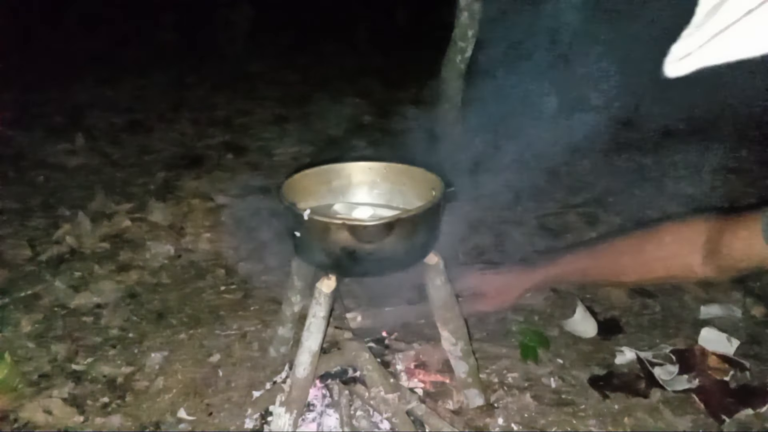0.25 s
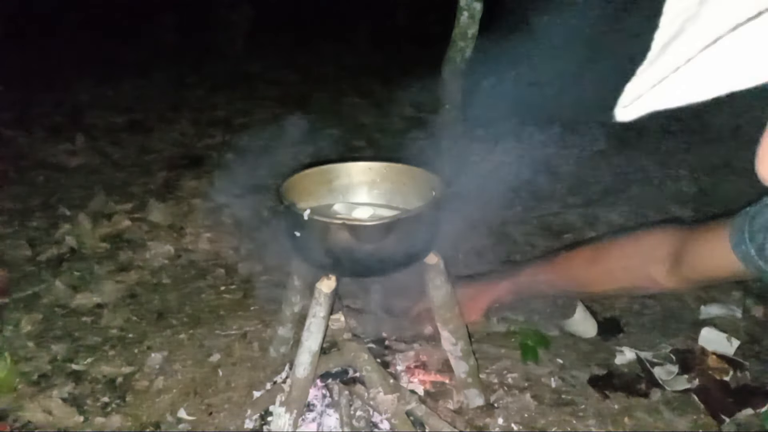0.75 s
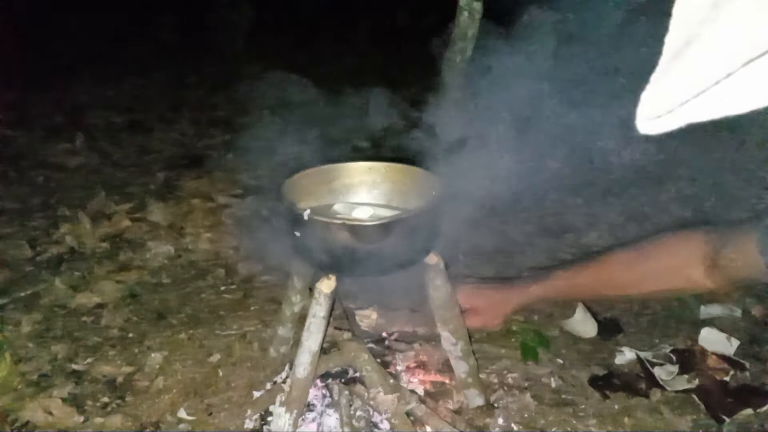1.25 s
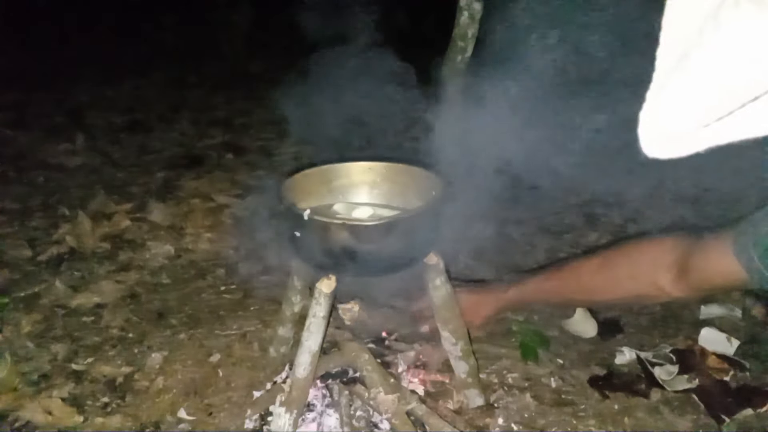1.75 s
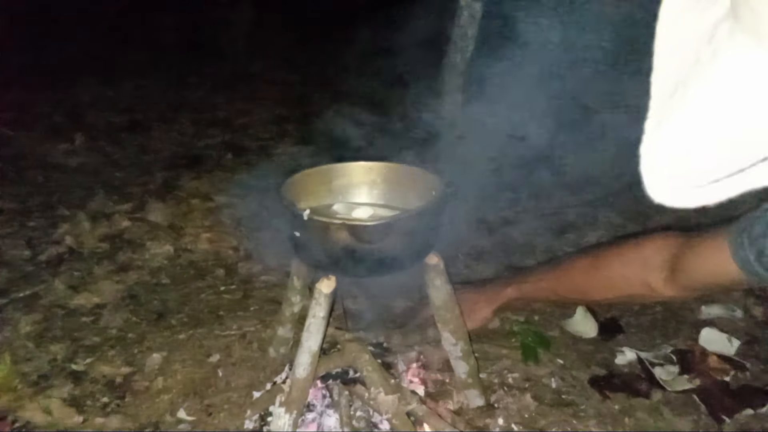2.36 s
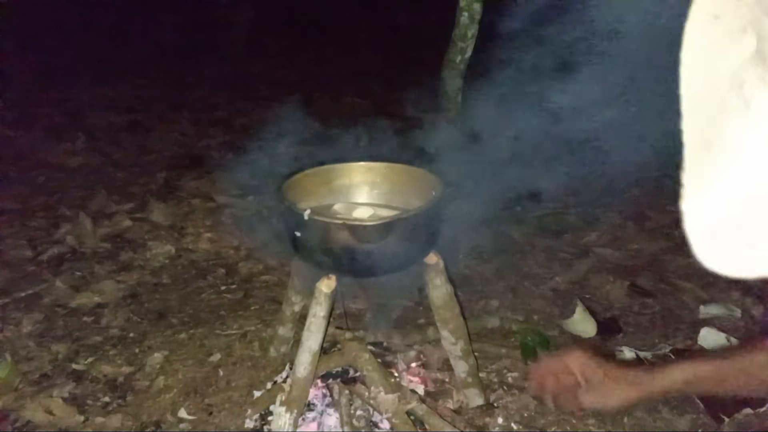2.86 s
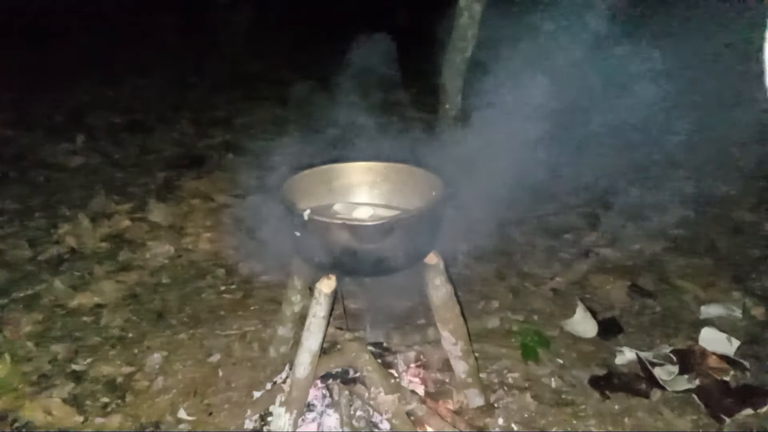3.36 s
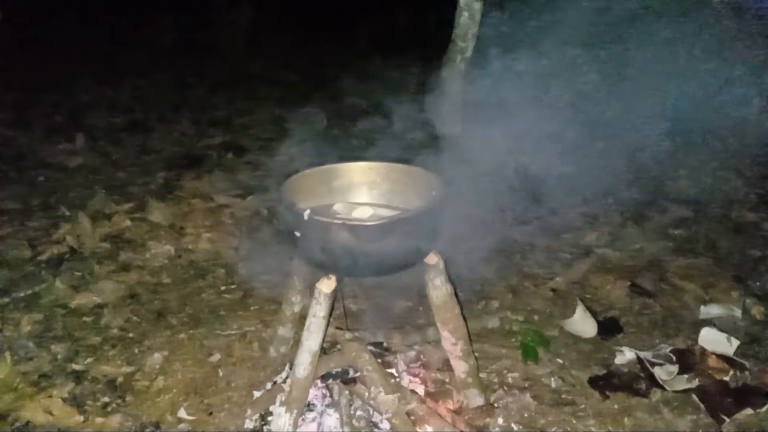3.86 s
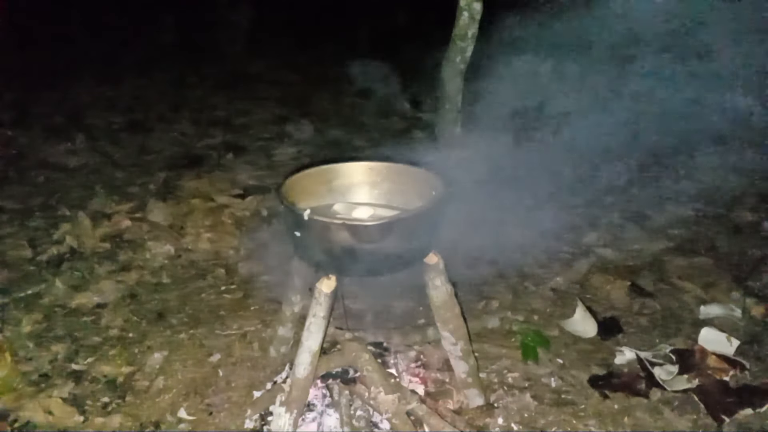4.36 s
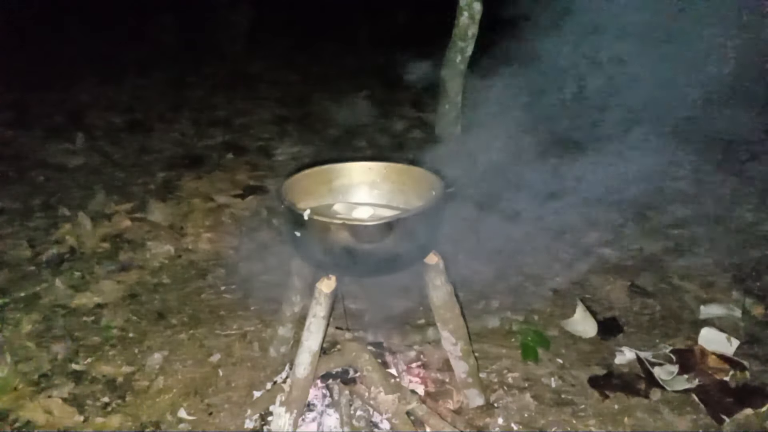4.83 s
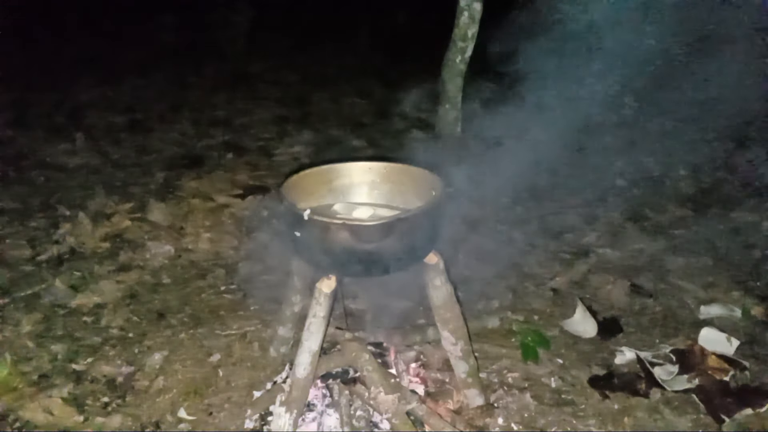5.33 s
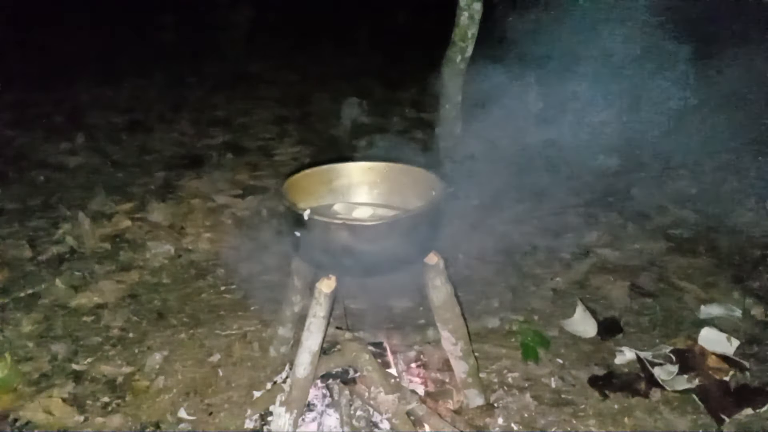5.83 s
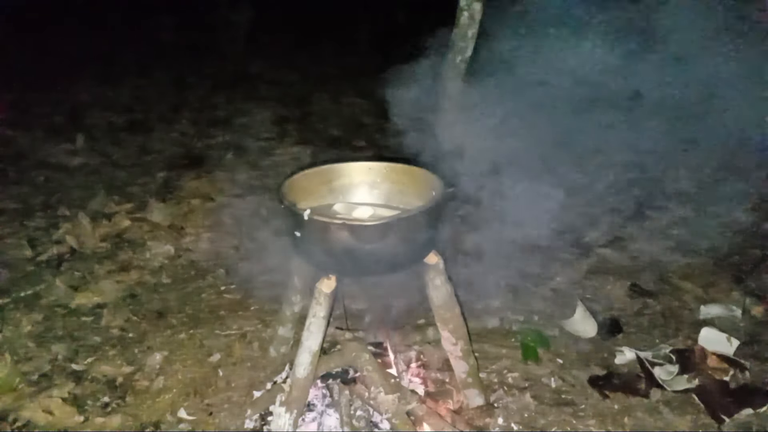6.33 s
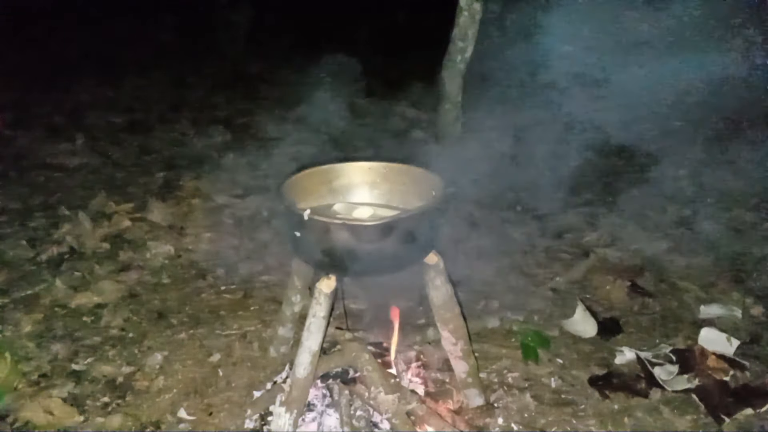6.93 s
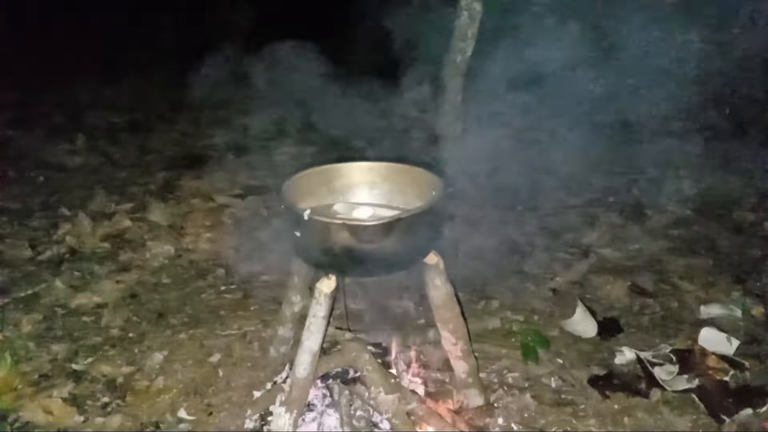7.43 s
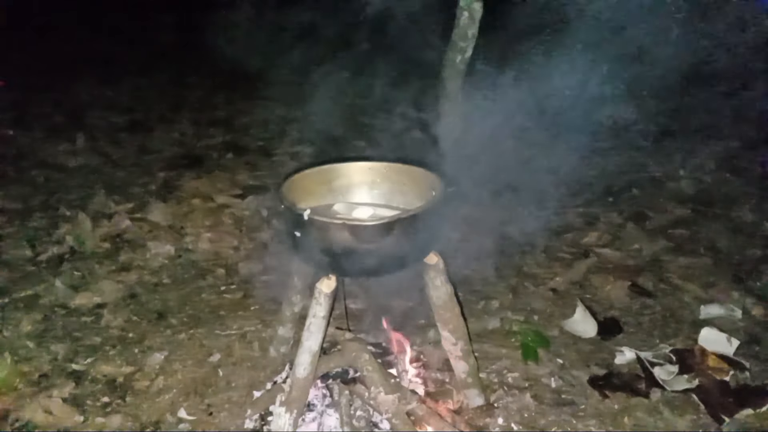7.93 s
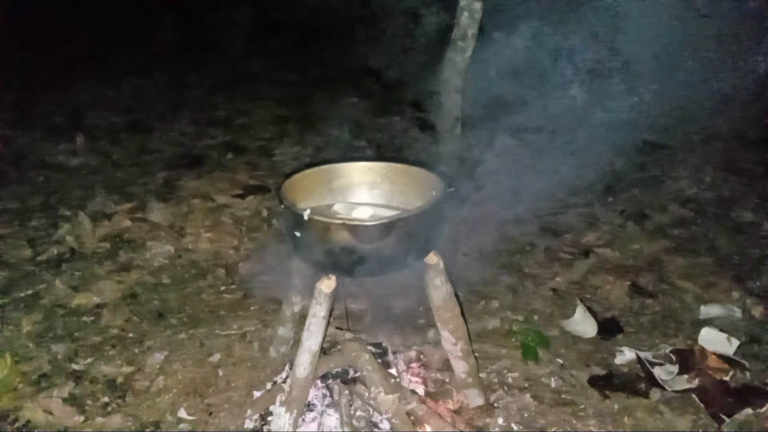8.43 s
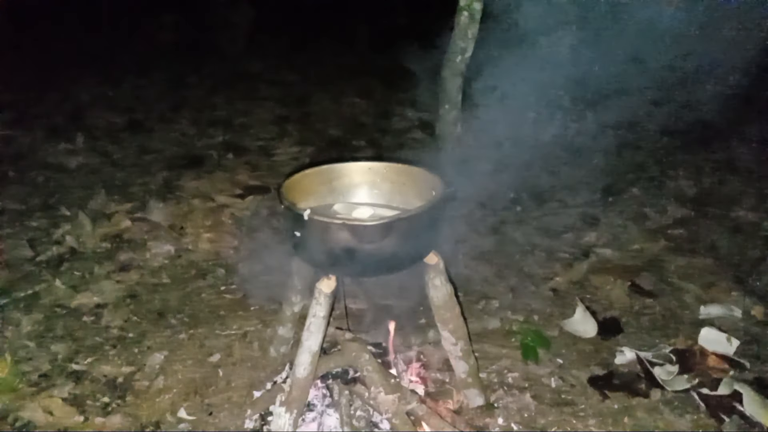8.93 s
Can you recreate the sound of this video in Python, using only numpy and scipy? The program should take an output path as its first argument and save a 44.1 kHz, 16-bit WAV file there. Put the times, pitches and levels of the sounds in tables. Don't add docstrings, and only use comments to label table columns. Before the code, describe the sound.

A night forest, about nine seconds, heard from beside a small wood fire. Tree crickets trill around 3.7 kHz throughout, over a blurred field-cricket chorus near 5 kHz and thin higher shimmer. From 0 to 1.5 a near cricket dominates, its crisp two- or three-stroke chirps falling in pitch, four to five per second. It rests; the chorus dips briefly near 2.2, 3.1 and 3.4. Small snaps come at 3.1 and, more sharply, 3.8, with leaf rustle, as a distant, echoing cricket calls from 3.5 to 4.3. The near cricket returns from 4.9 to 6.8, over light ticks. From 7.1 to 8.9 the far cricket answers again while twig cracks, sparks and dry rustles gather, strongest near 8.1 to 8.25. Faint katydid rasps pulse high throughout; flame murmur, soft gusts and low night hum stay barely audible.

```python
import sys
import numpy as np
from scipy import signal
from scipy.fft import rfft, irfft, next_fast_len
from scipy.io import wavfile
from scipy.ndimage import map_coordinates

SR = 44100
rng = np.random.default_rng(int(sys.argv[2]) if len(sys.argv) > 2 else 0)


def transcribe(signal):
    frames = np.atleast_2d(signal).T
    limited = np.clip(frames, -1, 1)
    pcm = np.round(limited * 32767).astype(np.int16)
    wavfile.write(sys.argv[1], SR, pcm)


def voltage_ratio(decibels):
    exponent = np.asarray(decibels, float) / 20
    return 10 ** exponent


N = 405279


def rms_one(x):
    return x / np.sqrt(np.mean(x ** 2) + 1e-20)


def coloured(x, spectrum):
    hz, db = np.transpose(spectrum)
    size = next_fast_len(N)
    log_hz = np.log(np.fft.rfftfreq(size, 1 / SR) + 1)
    gain = voltage_ratio(np.interp(log_hz, np.log(hz), db, left=-90, right=-90))
    return irfft(rfft(x, size) * gain, size)[:N]


def drift(rate_hz):
    return np.interp(np.arange(N) / SR * rate_hz, np.arange(4000), rng.standard_normal(4000)) * 1.2


def band(x, low_hz, high_hz, order=2):
    sos = signal.butter(order, [low_hz, high_hz], "band", fs=SR, output="sos")
    return signal.sosfilt(sos, x + 1e-18)


def blur(spectrum, patchy_db, rate):
    noise = coloured(rng.standard_normal(N), spectrum)
    return rms_one(noise * voltage_ratio(patchy_db * drift(rate)))


def trees(x, t60, wet_db):
    t = np.arange(SR // 2) / SR
    tail = rng.standard_normal(len(t)) * voltage_ratio(-60 * t / t60) * (t > .004)
    return x + voltage_ratio(wet_db) * signal.fftconvolve(x, tail / np.linalg.norm(tail))[:N]


def dip(start, end, db, edge):
    return np.interp(np.arange(N) / SR, [start - edge, start, end, end + edge], [0, db, db, 0])


def swells(rows, rise_db_s, fall_db_s):
    t = np.arange(0, N, 32) / SR
    gains = 0
    for start, end, *db in rows:
        rise = np.minimum(rise_db_s * (t - start), 0)
        fall = np.minimum(fall_db_s * (end - t), 0)
        gains = gains + voltage_ratio(np.add.outer(db, rise + fall))
    return np.repeat(gains, 32, axis=1)[:, :N]


def chirps(rows, first_db, first_overtone_db, later_overtone_db):
    first_lead_s = .0008
    out = []
    for s, second, third, db in rows:
        out.append((s - first_lead_s, db + first_db, first_overtone_db))
        for gap, late in [(second, second), (third, second + third)]:
            if gap > .02:
                out.append((s + late, db, later_overtone_db))
    return out


def strokes(events, stroke, spread, third_db=-30, opening=((0, 0),), waver_db=0):
    tone, overtones = np.zeros((2, N + SR))
    ms, hz, db = np.transpose(stroke)
    t = np.arange(ms[0], ms[-1], 1000 / SR)
    edge, soft_edge = signal.windows.tukey(len(t), .12), signal.windows.tukey(len(t), .4)
    second_shape = np.exp(-((t - 13) / 8) ** 2) * soft_edge
    third_shape = np.exp(-((t - 9.5) / 5.5) ** 2) * soft_edge
    first_half = np.clip((9 - t) / 3, 0, 1)
    waver = waver_db * drift(250)
    chances = rng.standard_normal((len(events), 3))
    for (s, peak_db, *second_db), (slow, tune, phase) in zip(events, chances):
        late = t * (1 + 4 * spread * slow)
        turn = 2 * np.pi * np.cumsum(np.interp(late, ms, hz) * (1 + spread * tune)) / SR + phase
        at = round((s + ms[0] / 1000) * SR)
        span = slice(at, at + len(t))
        opening_db = first_half * np.interp(s, *np.transpose(opening))
        level = voltage_ratio(peak_db + opening_db + waver[(at + np.arange(len(t))) % N])
        tone[span] += level * edge * np.interp(late, ms, voltage_ratio(db)) * np.sin(turn)
        rough_db = sum(second_db or [-34])
        second = second_shape * np.sin(2 * turn)
        third = third_shape * voltage_ratio(third_db - rough_db / 2) * np.sin(3 * turn)
        overtones[span] += voltage_ratio(peak_db + rough_db) * (second + third)
    return np.array([tone, overtones])[:, :N]


# start in seconds, gap to second stroke in ms, gap to third in ms (0 = none), peak in dB.
NEAR_CHIRPS = [(0.056, 38.5, 41.2, -28.6), (0.2746, 38.0, 40.0, -28.4), (0.5274, 39.4, 0.0, -28.4),
               (0.7498, 38.2, 0.0, -28.8), (0.9624, 41.5, 0.0, -28.8), (1.1727, 35.0, 41.2, -29.0),
               (1.3886, 38.8, 40.2, -29.6), (4.8529, 0.0, 0.0, -40), (4.8938, 41.5, 0.0, -27.8),
               (5.1145, 40.2, 40.3, -28.7), (5.3333, 38.4, 40.6, -29.2), (5.5717, 35.9, 41.3, -28.5),
               (5.7872, 38.7, 40.9, -28.2), (6.0042, 37.6, 40.5, -28.1), (6.2616, 37.1, 0.0, -28.8),
               (6.4751, 40.1, 0.0, -28.4), (6.697, 37.6, 40.4, -27.9)]
# time in seconds, level in dB.
NEAR_OPENING_DB = [(0.0, 0.1), (0.8, -1), (1.2, -0.5), (1.45, -3), (4.9, 0.5), (5.2, -0.7), (5.7, -1.3),
                   (6.1, -0.1), (6.5, -0.5), (6.75, -0.4)]
# time in ms, pitch in Hz, level in dB.
NEAR_WING_STROKE = [(-3.2, 6700, -30), (-2, 6100, -12), (-1, 5520, -22), (.1, 5410, -5), (2.5, 5340, -1),
                    (7.5, 5195, -1), (10.3, 5090, 0), (13.1, 4985, -4), (15.8, 4845, -3), (18, 4765, -4),
                    (19.6, 4720, -9), (21.5, 4690, -26)]
# frequency in Hz, level in dB.
GROUND_COLOUR = [(3000, -14), (4850, -13), (5100, 0), (9000, 0)]


def near_cricket():
    ground_null_hz, ground_echo_db = 5226, -3
    rows = np.multiply(NEAR_CHIRPS, [1, 1 / 1000, 1 / 1000, 1])
    events = chirps(rows, first_db=-1.5, first_overtone_db=-20, later_overtone_db=-28)
    tone, overtones = strokes(events, NEAR_WING_STROKE, spread=0.00094, third_db=-26,
                              opening=NEAR_OPENING_DB, waver_db=1.28)
    lag = 18.5 * SR / ground_null_hz
    delayed = map_coordinates(tone, [np.arange(N) - lag], order=3)
    echo = coloured(delayed, GROUND_COLOUR)
    near = voltage_ratio(-3.8) * (tone + voltage_ratio(ground_echo_db) * echo) + overtones * voltage_ratio(5 * drift(420))
    return trees(near, t60=.22, wet_db=-16)


# start in seconds, gap to second stroke in seconds, gap to third in seconds, peak in dB.
FAR_CHIRPS = [(3.513, 0, 0, -59), (3.6007, 0.046, .0437, -40.5), (3.9924, 0, 0, -41),
              (4.2057, 0.051, 0, -39), (7.1024, 0, 0, -39), (7.317, 0.039, 0, -41),
              (7.5328, 0.041, .0386, -42), (7.748, 0.039, 0, -39), (7.957, 0.035, 0, -38),
              (8.17, .0386, 0, -38), (8.3852, 0.041, 0, -37.5), (8.5615, 0, 0, -49), (8.8475, 0, 0, -45)]
# time in ms, pitch in Hz, level in dB.
FAR_WING_STROKE = [(0, 5900, -20), (2.5, 5770, -3), (7, 5520, 0), (12, 5270, -4), (16.5, 5050, -22)]


def far_cricket():
    events = chirps(FAR_CHIRPS, first_db=-1.5, first_overtone_db=-35, later_overtone_db=-35)
    calls = strokes(events, FAR_WING_STROKE, spread=0.013).sum(0)
    return voltage_ratio(-2.5) * trees(calls, t60=.3, wet_db=-5)


# start in seconds, end in seconds, level in dB, teeth per second.
KATYDID_BOUTS = [(0.12, 0.2, -80, 343), (0.21, 0.56, -71, 342.5), (0.61, 0.86, -72, 347.5),
                 (0.87, 1.12, -75, 341), (1.12, 1.36, -71, 346), (1.33, 1.56, -73, 344),
                 (1.6, 1.88, -69, 342), (1.94, 2.1, -81, 345), (2.07, 2.23, -74, 345),
                 (2.22, 2.5, -71, 342.5), (2.48, 2.64, -81, 344), (2.73, 3.05, -70, 340),
                 (3.32, 3.66, -72.5, 342), (3.85, 4.17, -70, 342), (4.38, 4.7, -71, 339.5),
                 (4.84, 5.08, -72.5, 344.5), (5.03, 5.3, -72, 342), (5.55, 5.8, -73.5, 341.5),
                 (5.78, 5.93, -77, 343), (5.97, 6.16, -77, 346), (6.32, 6.66, -69, 344),
                 (6.92, 7.2, -76, 341.5), (7.4, 7.6, -72, 347), (7.89, 8.14, -70, 341),
                 (8.39, 8.7, -68, 343), (8.76, 8.9, -77, 348), (9.0, 9.3, -68.5, 344)]
# frequency in Hz, level in dB.
KATYDID_WING = [(9300, -15.5), (9800, -4.5), (10500, 1), (11200, -1.5), (11800, -9), (12400, -21.5),
                (13200, -32.5)]


def katydids(rough):
    bout_skew = .65
    lines = range(13)
    clicks = np.zeros(N)
    fading_db = [3 * drift(15) + 2 * drift(70) for k in lines]
    waver = .055 * drift(45)
    for start, end, db, teeth_per_s in KATYDID_BOUTS:
        span = slice(round(start * SR), min(round(end * SR), N))
        t = np.arange(N)[span] / SR
        turn = 2 * np.pi * teeth_per_s * t + waver[span]
        effort = np.sin(np.pi * np.clip((t - start) / (end - start), 0, 1) ** bout_skew)
        comb = 0
        for k in lines:
            line_gain = effort ** (.4 + .16 * k) * voltage_ratio(fading_db[k][span])
            comb = comb + line_gain * np.cos((26 + k) * turn)
        clicks[span] += voltage_ratio(db + 2.0) * comb
    clicks *= voltage_ratio(1.9 * drift(60)) * (1 + rough * rng.standard_normal(N))
    return trees(coloured(clicks, KATYDID_WING), t60=.1, wet_db=-2)


# time in seconds, low part peak in
# dB, body pitch in Hz, high part level in dB.
TWIG_AND_LEAF_SNAPS = [(0.449, -65, 2500, -72), (0.679, -65, 2750, -67), (1.636, -66, 1560, -60),
                       (3.0975, -51, 1135, -46), (3.0975, -66, 332, -90), (3.0975, -63, 2280, -90),
                       (3.454, -67.5, 1310, -48), (3.796, -36.5, 1800, -41.5), (3.796, -51.5, 850, -90),
                       (3.796, -42, 2580, -90), (4.165, -62, 830, -50.5), (4.257, -56.5, 1670, -42),
                       (5.297, -63, 1330, -45.5), (5.394, -55.5, 840, -63), (5.394, -55, 1270, -90),
                       (5.394, -51, 2620, -90), (5.746, -57, 2730, -65), (6.212, -56, 2600, -61),
                       (6.226, -48, 2500, -80), (6.257, -49, 2400, -80), (7.311, -47, 2180, -80),
                       (7.34, -65, 2000, -80), (7.372, -56.5, 2010, -80), (7.457, -50, 2300, -52.5),
                       (7.474, -57.5, 1430, -80), (7.579, -50, 3020, -55), (7.628, -56, 1040, -60),
                       (7.642, -62, 690, -80), (7.555, -69, 900, -80), (7.742, -46, 2800, -53.5),
                       (8.082, -51.5, 2030, -53.5), (8.121, -43, 640, -48.5), (8.121, -42.5, 1280, -90),
                       (8.1207, -45.5, 2390, -90), (8.129, -48, 720, -80), (8.199, -48, 4000, -47.5),
                       (8.238, -34, 3667, -48.5), (8.6, -57, 870, -67), (8.687, -68, 1830, -50),
                       (8.853, -53.5, 969.2, -76), (9.045, -48.5, 2550, -40.5),
                       (3.0967, -48, 4570, -90), (3.0975, -59, 1570, -90), (3.3705, -65, 2480, -90),
              (3.3705, -70, 1410, -90), (3.4416, -73, 1170, -90), (3.5419, -67, 2370, -90),
              (3.57, -62, 1470, -90), (3.791, -58, 2600, -42), (4.115, -63, 2900, -90),
              (7.431, -62, 1840, -85), (7.542, -56, 2930, -85), (7.729, -58, 2900, -85),
              (8.1205, -35, 4700, -90), (8.212, -55, 2750, -77), (8.586, -60, 3000, -77),
              (8.835, -56, 2790, -80)]
# time in seconds, peak in dB, colour in Hz.
SPARK_TICKS = [(0.2294, -78, 11000), (2.0512, -84, 14500), (2.6404, -75, 11500), (3.3712, -57.5, 11000),
               (4.02, -65, 12600), (4.115, -52.5, 9800), (4.7681, -81, 14500), (6.149, -65, 11000),
               (7.028, -80, 13400), (7.261, -75, 11000), (7.4485, -71, 9500), (7.533, -58, 10500),
               (7.544, -61, 8100), (7.5583, -62, 8500), (7.64, -62, 10000), (7.698, -62, 11000),
               (7.71, -65, 12000), (7.729, -63, 11000), (8.436, -75, 12600), (8.52, -66, 11000),
               (8.617, -62, 10500), (8.794, -74, 14000), (8.992, -98, 14000), (8.999, -85, 14000)]


def cracks():
    spit_hz = 10180
    out, t = np.zeros(N + SR), np.arange(2000) / SR
    rows = [(*crack, spit_hz) for crack in TWIG_AND_LEAF_SNAPS]
    rows += [(s, -95, 2000, db + 9.0, hz) for s, db, hz in SPARK_TICKS]
    thin, tail = voltage_ratio(-60 * t / .006), voltage_ratio(-60 * t / .05)
    noises = rng.standard_normal((len(rows), 2, len(t)))
    for (s, low_db, hz, high_db, bright_hz), (low_noise, high_noise) in zip(rows, noises):
        low_noise[0] = 8
        click = band(low_noise * thin, hz / 1.9, hz * 1.4 + 300)
        body = band(low_noise * (thin + .2 * tail), hz / 1.12, hz * 1.12)
        knock = click + 1.8 * body
        spit = band(high_noise * (thin + .09 * tail), bright_hz / 1.4, min(bright_hz * 1.14, 16200))
        at = round(s * SR)
        out[at:at + len(t)] += voltage_ratio(low_db) * knock / np.abs(knock).max()
        out[at:at + len(t)] += voltage_ratio(high_db + 15.0) * spit / np.abs(spit).max()
    return out[:N]


# full from and to in seconds, low and high level in dB, litter pitch in Hz.
LITTER_STIRS = [(2.161, 2.19, -71, -71.5, 1520), (3.458, 3.7, -79, -73, 1200),
                (3.52, 3.6, -69.5, -78, 1380), (3.626, 3.57, -82, -71, 1500), (3.5, 3.7, -73, -91, 2440),
                (3.75, 3.92, -71.5, -77, 2100), (3.795, 3.793, -50.5, -57, 1480),
                (3.834, 3.857, -68.5, -90, 1030), (4.107, 4.17, -76.5, -70, 890),
                (4.257, 4.23, -72, -69, 1610), (5.4, 5.415, -70.5, -78, 2420),
                (6.152, 6.15, -67.5, -66.5, 2210), (6.234, 6.33, -65.5, -62, 2060),
                (7.26, 7.5, -69.5, -80, 2900), (7.308, 7.3, -64.5, -82, 2220), (7.342, 7, -72, -83, 1010),
                (7.448, 7.52, -65.5, -76, 1460), (7.545, 7.615, -58, -63.5, 2700),
                (7.554, 7.6, -86, -81, 1000), (7.634, 7.66, -64.5, -67, 920),
                (7.676, 7.74, -62.5, -70, 2600), (8.084, 8.084, -63.5, -68, 1960),
                (8.135, 8, -72, -66, 1090), (8.196, 8.285, -65.5, -72, 2740), (8.432, 8.4, -75.5, -76, 700),
                (8.595, 8.623, -74, -64.5, 900), (8.6, 8.678, -65.5, -74, 2120),
                (8.64, 8.67, -91, -89, 600), (8.837, 8.878, -66, -74.5, 1092),
                (8.84, 8.96, -67.5, -81, 2830), (0.673, 0.7, -76, -88, 1600), (1.45, 1.7, -85, -94, 1550),
                (1.912, 1.86, -69, -92, 1500), (8.945, 8.9, -83, -92, 1910), (9.042, 9.07, -75, -73, 2120)]
# frequency in Hz, level in dB per Hz.
LITTER_TOP = [(3000, -42), (5000, 12), (7500, -3.5), (10000, 13), (12000, 0.5), (14000, -5.5), (16000, -2)]


def rustle():
    litter_db_per_octave, grains_per_s = -12.5, 1700
    edges = np.geomspace(350, 16000, 19)
    grains = voltage_ratio(1.36 * np.minimum(rng.exponential(1, (2, N)), 5)) * rng.standard_normal((2, N))
    grains *= rng.random((2, N)) < grains_per_s * voltage_ratio(5 * drift(130)) / SR
    leaves = []
    for k in range(18):
        leaf = rms_one(band(grains[k % 2], edges[k], edges[k + 1]))
        leaves.append(leaf * voltage_ratio(2.6 * drift(22)))
    sized = []
    for start, end, low_db, high_db, hz in LITTER_STIRS:
        octaves_off = np.abs(np.log2(edges[:13] * 1.1 / hz))
        sized.append((start, end, high_db, *(low_db + litter_db_per_octave * octaves_off)))
    high, *gains = swells(sized, rise_db_s=1498, fall_db_s=420)
    low = voltage_ratio(-12.0) * sum(gain * leaf for gain, leaf in zip(gains, leaves))
    return low + high * voltage_ratio(11) * rms_one(coloured(sum(leaves[10:]), LITTER_TOP))


# carrier in Hz, pulses per second, level in dB.
TREE_TRILLS = [(3632, 89, 0), (3815, 66, -2), (3696, 116, -3), (3900, 74, -6), (4043, 46, -8),
               (3545, 58, -7)]
# start in seconds, end in seconds, depth in dB.
TREE_LULLS = [
    (0.0, 0.366, -1.5),
    (2.224, 2.345, -8),
    (4.97, 5.7, -4.5),
    (7.33, 7.608, -6.5),
]


def tree_crickets():
    trills, t = 0, np.arange(N) / SR
    for hz, pulses_per_s, db in TREE_TRILLS:
        beat = np.maximum(np.sin(2 * np.pi * pulses_per_s * t + 1.5 * drift(5.5)) + 0.39, 0)
        carrier = np.sin(2 * np.pi * hz * t + 0.68 * drift(14))
        trills = trills + voltage_ratio(db + 3.5 * drift(5)) * beat * carrier
    far_blur = rms_one(band(rng.standard_normal(N), 3571, 3951, order=4))
    chorus = rms_one(rms_one(trees(trills, t60=1.0, wet_db=0.0)) + voltage_ratio(5.5) * far_blur)
    return voltage_ratio(-55 + sum(dip(*lull, edge=0.15) for lull in TREE_LULLS)) * chorus


# frequency in Hz, level in dB per Hz.
FIELD_BAND = [(2500, -51), (4250, -35), (4270, -20.5), (4380, -22), (4550, -11), (4710, 0), (5240, 10.5),
              (5560, 3), (5940, -20.5), (6150, 0.5), (8000, -37.5), (13500, -120)]


def field_crickets():
    times_s = np.sort(rng.uniform(.01, N / SR, 300))
    many = np.column_stack([times_s, rng.normal(0, 3, 300)])
    calls = strokes(many, FAR_WING_STROKE, spread=.02).sum(0)
    calls = rms_one(trees(calls, t60=0.37, wet_db=9.5))
    haze = rms_one(coloured(rng.standard_normal(N), FIELD_BAND))
    return voltage_ratio(-54.5) * rms_one(calls * voltage_ratio(-3.0) + haze)


# frequency in Hz, level in dB per Hz.
MIDDLE_BAND = [(3470, -45), (5900, -8.5), (6010, -4), (6510, 8.5), (6900, 0), (7260, -9), (7700, -15.5),
               (10000, -55), (16900, -120)]
# frequency in Hz, level in dB per Hz.
HIGH_BAND = [(7300, -32), (8000, -13.5), (8550, -4), (9000, 3), (9460, 0), (9900, -11), (10800, -17),
             (11500, -26), (12300, -46), (13500, -62)]


def distant_choruses():
    middle = voltage_ratio(-64.5) * blur(MIDDLE_BAND, patchy_db=2.5, rate=14)
    return middle + voltage_ratio(-59.5) * blur(HIGH_BAND, patchy_db=1.6, rate=40)


# time in seconds, depth in dB, fall in seconds, recovery in seconds.
SUPPRESSOR_DUCKS = [
    (2.165, -9, 0.053, 0.11),
    (3.101, -10, 0.02, 0.2),
    (3.372, -10, 0.032, 0.089),
]


def ducking():
    t = np.arange(N) / SR
    quick_db = 0
    for s, db, fall, back in SUPPRESSOR_DUCKS:
        quick_db = quick_db + np.interp(t, [s, s + fall, s + fall + back], [0, db, 0])
    return voltage_ratio(quick_db + dip(2.48, 3.35, db=-2.5, edge=0.18))


# full from in seconds, to in seconds, level in dB.
FLAME_FLARES = [(1.64, 1.65, -80), (2.53, 2.54, -73.5), (2.9, 3.3, -84), (3.09, 3.1, -73), (3.4, 3.55, -81),
                (3.79, 3.81, -86), (4.98, 5.0, -76), (5.41, 5.43, -71), (5.47, 5.55, -77),
                (5.62, 5.68, -81), (5.75, 5.78, -75), (6.25, 6.27, -75.5), (7.45, 7.46, -89),
                (7.55, 7.65, -80), (8.122, 8.135, -63), (8.238, 8.243, -63.5), (8.21, 8.27, -84),
                (8.64, 8.66, -86), (8.86, 8.89, -82)]


def flame():
    flares, = swells(FLAME_FLARES, rise_db_s=900, fall_db_s=283)
    murmur = rms_one(band(rng.standard_normal(N), 340, 560))
    return flares * voltage_ratio(-7.5) * murmur * voltage_ratio(2.5 * drift(20))


# full from in seconds, to in seconds, level in dB.
WIND_GUSTS = [(0.4, 0.9, -97), (2.7, 3.1, -82), (3.33, 3.5, -81), (3.86, 4.2, -86), (5.07, 5.12, -75),
              (5.4, 5.45, -75), (6.3, 6.35, -84), (6.68, 6.75, -72.5), (7.5, 7.57, -80), (7.72, 7.85, -78),
              (8.1, 8.28, -81), (8.45, 8.65, -72), (8.86, 8.9, -74), (9.16, 9.19, -73)]
# frequency in Hz, level in dB per Hz.
WIND_COLOUR = [(18, -12), (40, -3), (65, 6), (100, -10), (160, -20), (250, -52)]


def wind():
    calm_db = -93
    gusts, = swells(WIND_GUSTS, rise_db_s=216, fall_db_s=185) + voltage_ratio(calm_db)
    return gusts * blur(WIND_COLOUR, patchy_db=4.5, rate=11)


# frequency in Hz, level in dB per Hz.
AIR_COLOUR = [(13, -30), (22, -10), (75, -1), (103, 0), (156, -4.5), (337, -16.5), (1150, -22.5),
              (1940, -21), (2340, -22.5), (2710, -19.5), (2940, -21.5), (3200, -19.5), (4160, -32),
              (7040, -120)]
# frequency in Hz, level in dB per Hz.
HISS_COLOUR = [(7060, -38), (11800, -10), (12600, -17), (13600, -14.5), (14400, -10), (15200, -8.5),
               (16000, -11)]


def night_air():
    hum = voltage_ratio(-80.5) * blur(AIR_COLOUR, patchy_db=0.0, rate=5.8)
    return hum + voltage_ratio(-91.5) * blur(HISS_COLOUR, patchy_db=2.5, rate=12)


def scene():
    choruses = tree_crickets() + field_crickets() + distant_choruses()
    insects = near_cricket() + far_cricket() + katydids(rough=.85) + choruses * ducking()
    fire = cracks() + rustle() + flame()
    return (insects + fire + wind() + night_air())[None]


def band_limit(x):
    return signal.sosfilt(signal.butter(12, 15900, fs=SR, output="sos"), x)


def record(dry):
    cut = signal.sosfilt(signal.cheby2(10, 25, 16600, fs=SR, output="sos"), dry)
    return band_limit(cut)


dry = scene()
out = record(dry)
transcribe(out)
```